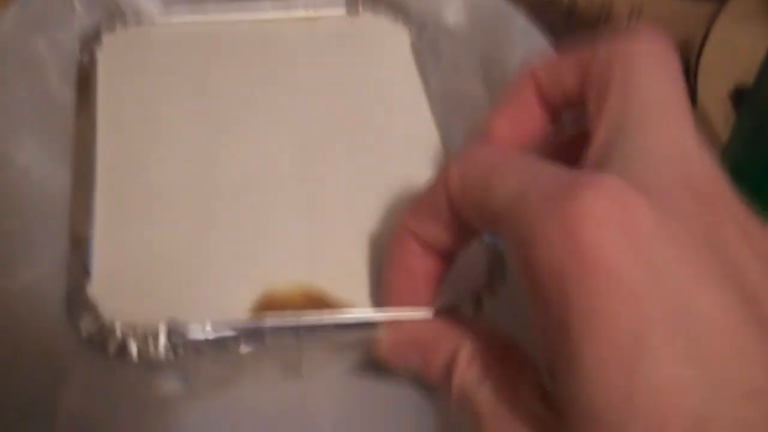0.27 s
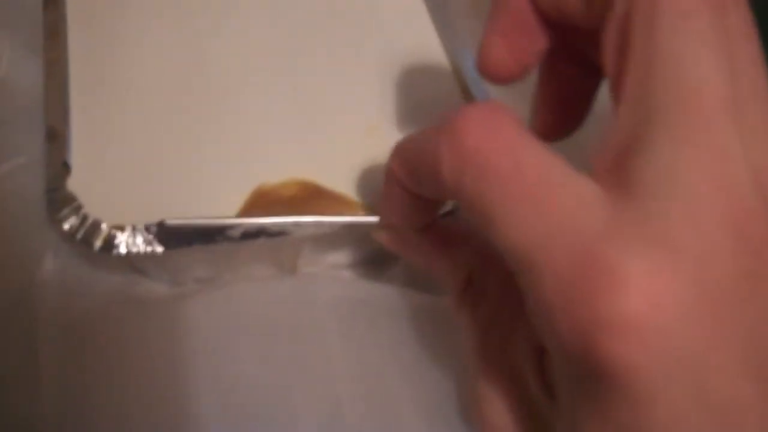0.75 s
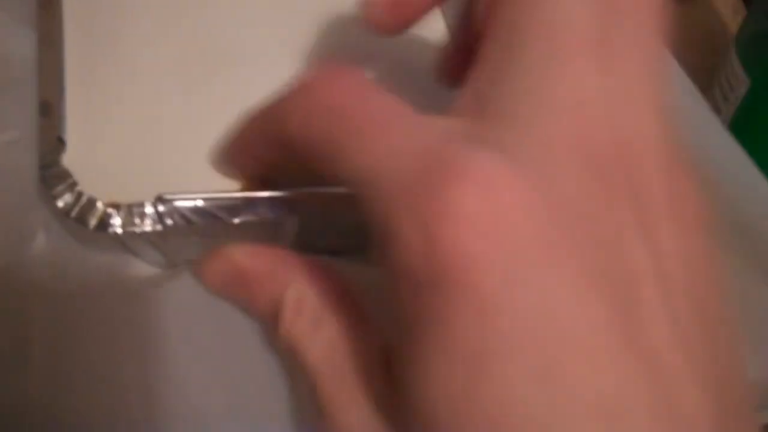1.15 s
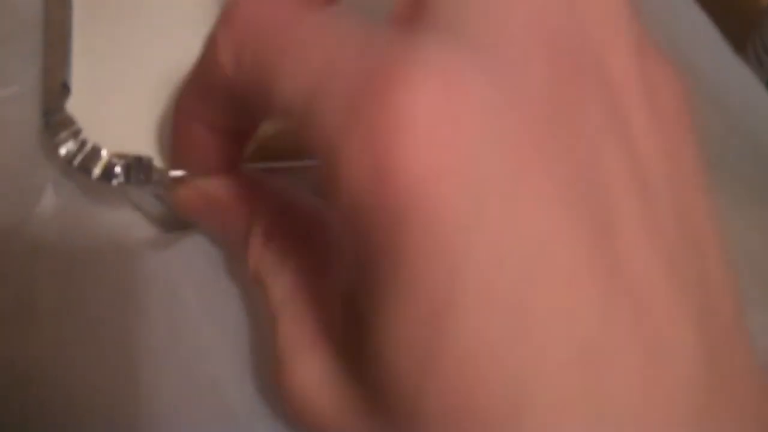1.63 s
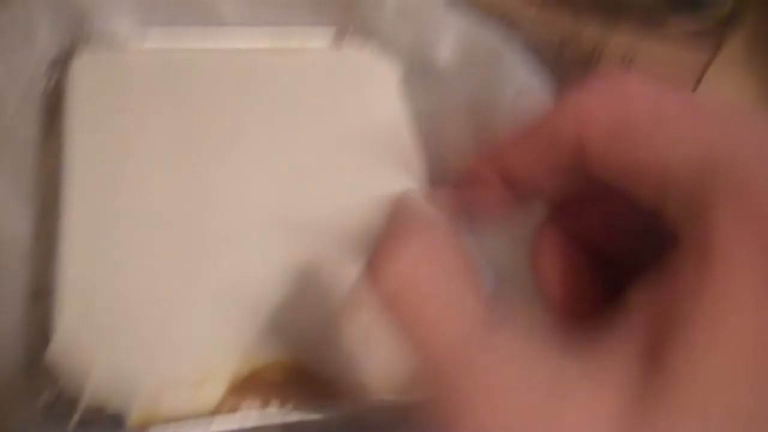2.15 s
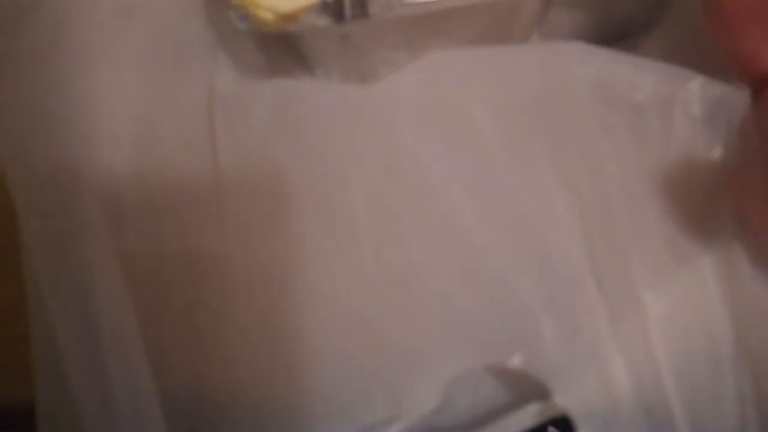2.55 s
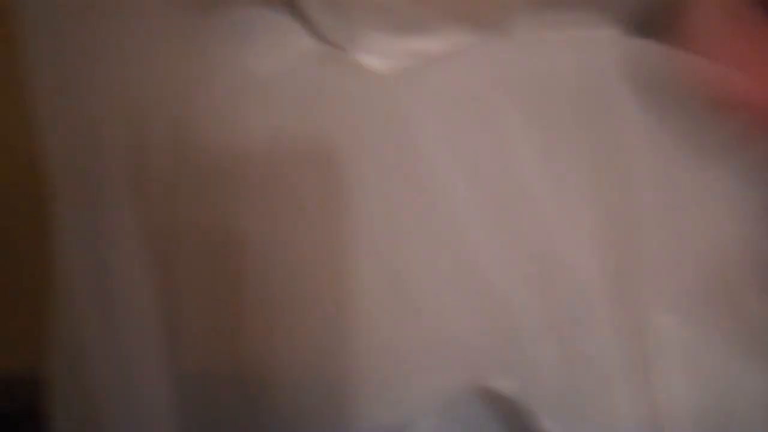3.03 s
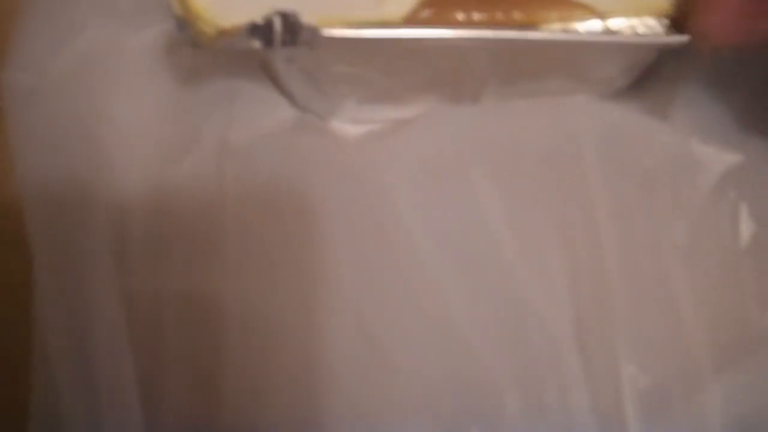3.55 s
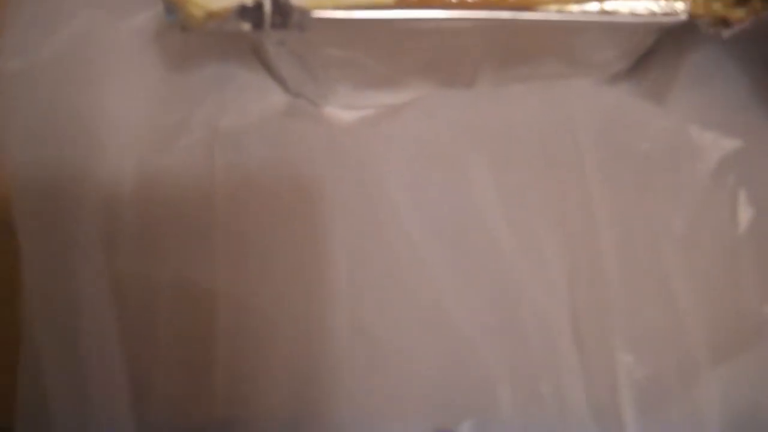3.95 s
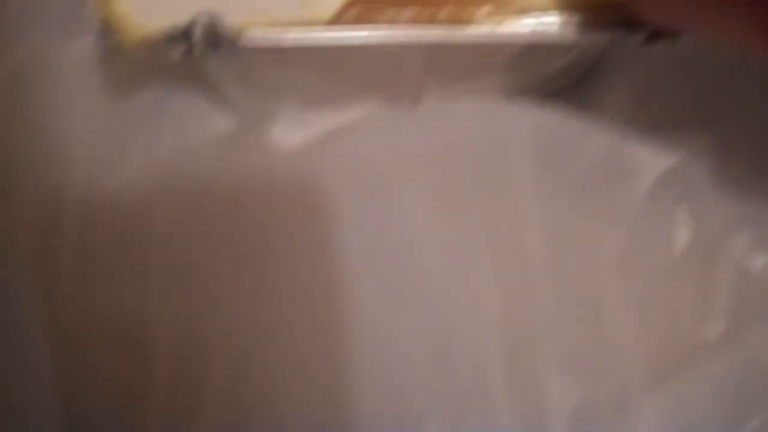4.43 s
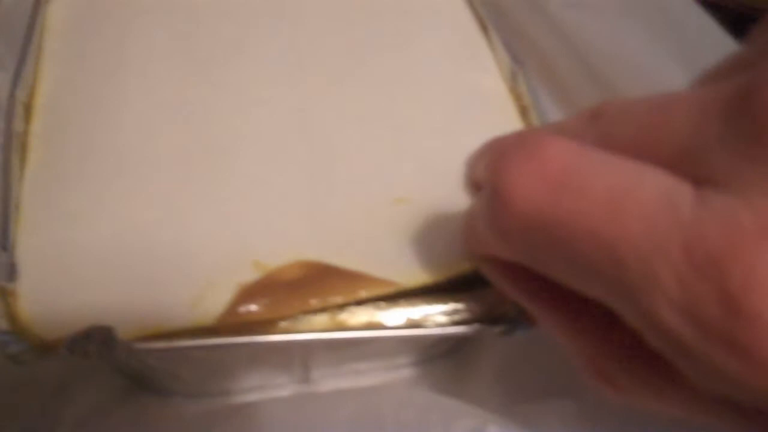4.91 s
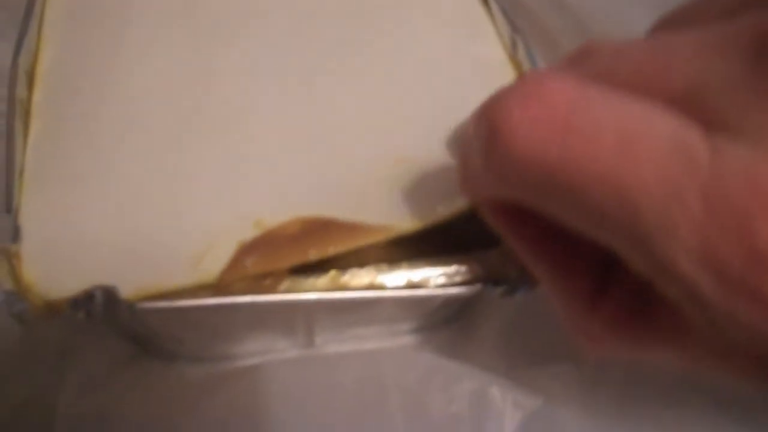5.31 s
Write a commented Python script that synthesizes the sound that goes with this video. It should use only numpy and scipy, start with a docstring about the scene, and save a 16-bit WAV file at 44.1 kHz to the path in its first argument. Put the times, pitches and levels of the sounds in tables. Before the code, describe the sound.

Crisp foil and thin plastic crinkle and snap close up, swelling into a loud crackling burst, then thinning to sparse ticks in a quiet room.

```python
"""Fingers bend up the rim of a foil tray in a plastic bag, then prise off its card lid, close to two microphones.
From the start, bag and foil rustle as swarms of noise clicks and tiny ticks; creases snap and dents pop with a pitch.
Near 2.4 s the tray drags over the table as low noise, then all sound dips briefly; the loudest snap, at 3.15 s,
overloads. The rustle thins out; near 4.75 s knocks ring the tray's tones, and the last snaps come by 5.53 s.
Throughout, a small room adds short echoes, steady air noise and the wavering tones of a running appliance."""
import sys
import numpy as np
from scipy import signal
from scipy.fft import rfft, irfft
from scipy.io import wavfile
from scipy.ndimage import uniform_filter1d

SR = 44100
rng = np.random.default_rng(int(sys.argv[2]) if len(sys.argv) > 2 else 0)


def persist_wave(psi):
    """Save psi, clipped to +-1, as 16-bit WAV."""
    counts = np.round(np.clip(psi, -1, 1) * 32767).astype(np.int16)
    wavfile.write(sys.argv[1], SR, np.atleast_2d(counts).T)


N = 245443

# The five bands, here called thump, body, middle, treble and top: lower f/Hz, upper f/Hz
BAND_EDGES = [(300, 1100), (1100, 2800), (2800, 4500), (4500, 9000), (9000, 18000)]
# Likeness of left and right, one number for each band (1 = the same, 0 = unrelated)
BAND_LIKENESS = [0.86, 0.87, 0.63, 0.25, 0.089]
# Tone colour of the foil heard through the microphone ports: f/Hz, relative level/dB
FOIL_COLOUR = [(240, -42.5), (400, -35), (910, -23.5), (1070, -27), (1230, -19.5), (1450, -17.5),
               (1920, -11.5), (2670, -11), (4170, -8), (6150, 5), (7250, 3), (9630, -11.5), (14200, -12)]
# Difference between the two microphone ports: f/Hz, left minus right/dB
PORT_DIFFERENCE = [(400, -1), (1300, -1.5), (2400, 0.5), (4400, 0), (5800, -6.5), (7000, 9.5), (8500, 11.5),
                   (11000, 21), (15000, 12)]

# How hard the fingers work the bag and foil: t/s, treble level/dB
RUSTLE_LEVEL = [(0.015, -45.5), (0.113, -43), (0.193, -49.5), (0.268, -35.5), (0.33, -43), (0.375, -39.5),
                (0.41, -47), (0.467, -51), (0.514, -43.5), (0.53, -34.5), (0.579, -39), (0.665, -34.5),
                (0.781, -34), (0.832, -36.5), (0.945, -36.5), (1.0, -31), (1.13, -41), (1.156, -55),
                (1.232, -45), (1.256, -24.5), (1.285, -29), (1.31, -37), (1.382, -45.5), (1.499, -57),
                (1.657, -57.5), (1.72, -36), (1.776, -47), (1.92, -28.5), (2.07, -37), (2.139, -35),
                (2.209, -47.5), (2.233, -53), (2.319, -59), (2.34, -33), (2.37, -23.5), (2.419, -33.5),
                (2.478, -30.5), (2.484, -30), (2.499, -38.5), (2.582, -20), (2.718, -43), (2.748, -34.5),
                (2.794, -33.5), (2.833, -23), (2.932, -20), (2.962, -23), (3.002, -21), (3.138, -23.5),
                (3.162, -33.5), (3.209, -29.5), (3.25, -54), (3.341, -48.5), (3.402, -64), (3.482, -44.5),
                (3.66, -57.5), (3.911, -57), (4.159, -64), (4.3, -60), (4.5, -66), (4.525, -59),
                (4.555, -47), (4.59, -53), (4.63, -62), (4.731, -64), (4.75, -45), (4.863, -62),
                (4.91, -56), (4.955, -50), (4.995, -62), (5.05, -67), (5.085, -54), (5.155, -61),
                (5.175, -54), (5.22, -62), (5.53, -64)]
# Swell of the rustle's three lower bands against the treble: t/s, level/dB
RUSTLE_FULLNESS = [(0, 1), (0.3, 0), (0.6, -1), (0.9, 0), (1.08, 4.5), (1.25, 0), (1.7, -0.5), (2.0, 0.5),
                   (2.2, -0.5), (2.42, 0), (2.55, -1.5), (2.7, 2.5), (3.0, -0.5), (3.3, 2.5), (4, 3),
                   (4.55, -3), (4.75, 3), (4.93, -4.5), (5.1, -0.5), (5.5, 0)]
# Thump, body and middle of the rustle: level against treble/dB when brisk, gain in dB per dB of softer rustle
RUSTLE_TILT = [(-23, 0.51), (-15.5, 0.21), (-12, 0.21)]
# Grain of each band: steady bed under the clicks/dB, share of the loudest clicks/dB
RUSTLE_GRAIN = [(0, -10), (-1, -6), (-3, -4), (-5.5, 0), (-1, -5)]
# Loudest clicks of the rustle: t/s, relative level/dB
LOUD_CLICKS = [(0.0651, 4), (0.072, 11.5), (0.091, 4), (0.1516, 9), (0.2129, 11), (0.374, 5), (0.5963, 8),
               (0.634, 10.5), (0.658, 5), (0.6708, 12.5), (0.675, 13), (0.703, 12), (0.7144, 6),
               (0.7227, 6.5), (0.7441, 8), (0.8348, 6), (0.8614, 9), (0.9122, 9), (1.0147, 7), (1.0233, 8),
               (1.1147, 6), (1.348, 10.5), (1.7101, 6), (1.7574, 9.5), (1.761, 9), (1.7929, 15),
               (1.814, 16.5), (1.8335, 12), (1.853, 12), (1.8876, 6), (1.891, 5), (1.9141, 8), (2.0007, 7),
               (2.0222, 7.5), (2.0385, 9), (2.0435, 8), (2.0496, 6), (2.101, 6), (2.125, 8.5), (2.179, 6),
               (2.1884, 13), (2.3543, 6), (2.3745, 8.5), (2.384, 9), (2.4249, 7), (2.4377, 7), (2.4496, 6),
               (2.4601, 11), (2.5102, 10), (2.5162, 10.5), (2.58, 2.5), (2.6419, 2), (2.649, 6),
               (2.6935, 10), (2.748, 12.5), (2.769, 3.5), (2.786, 6.5), (2.8977, 5.5), (2.9024, 5),
               (2.9368, 3.5), (2.9716, 3.5), (3.0702, 3), (3.0922, 5), (3.1046, 3), (3.129, 5), (3.1969, 8),
               (3.2143, 5)]
# Snapping creases: t/s, treble peak level/dB, body/dB, middle/dB, top/dB (these three against
# the treble peak), left minus right/dB, width/ms
CREASE_SNAPS = [(0.011, -27, -9.5, -10, -14, -3, 2.4), (0.04, -27.5, -16, -18, -19, 5, 1.9),
                (0.068, -29.5, -4, -17, -23, -2, 1.2), (0.085, -33, -8, -16, -18, 0, 1.3),
                (0.0988, -19, -10, -23, -22, -1, 0.46), (0.114, -27, -22, -20, -18, -1, 2),
                (0.123, -26, -8.5, -15, -17, 10, 0.81), (0.1315, -26.5, -7, -17, -9, -6, 2.7),
                (0.16, -23, -4.5, -9, -19, -0.5, 1.6), (0.217, -22.5, -13.5, -25, -15, -7, 1.1),
                (0.245, -27, -18, -14, -16, -2, 1.5), (0.256, -33, -18, -18, -16, -2, 2),
                (0.269, -19, -10, -14, -20, -4, 1.7), (0.2733, -15.5, -15, -14, -13, -3, 2.2),
                (0.299, -25, -21, -16, -18, 0, 1.1), (0.3145, -20.5, -20, -7, -10, -1, 2.6),
                (0.3347, -26, -23, -18, -20, -2, 1.2), (0.3597, -28, -17, -15, -15, 2, 1.7),
                (0.37, -22, -14, -19, -17, -2, 1), (0.389, -28, -18, -14, -14, 0, 2.7),
                (0.4414, -22, -12.5, -14, -20, -0.5, 4.2), (0.482, -29, -19, -14, -25, -6, 1.1),
                (0.5254, -17, -27, -22, -22, 0, 1.4), (0.537, -22, -20, -16, -18, 0, 3.3),
                (0.551, -24, -15, -14, -17, 0, 3), (0.556, -18, -15, -13, -15, -4, 2),
                (0.581, -36, -24, -16, -18, 2, 2.8), (0.594, -24, -20, -13, -18, -3, 2.3),
                (0.608, -21, -11, -8, -10, 0, 1.8), (0.627, -23, -9, -12, -14, 0, 2.7),
                (0.654, -21.5, -13, -3, -14, 2, 4.1), (0.6752, -21.5, -12, -7, -4, -2, 1.3),
                (0.6972, -17, -26, -11, -10, -1, 1.9), (0.772, -19.5, -25, -12, -8, 2, 1.7),
                (0.795, -21, -28, -13, -14, 2, 0.7), (0.8678, -13, -27, -16, -19, 1, 2.3),
                (0.896, -20, -21, -16, -16, 0, 1.7), (0.9027, -18.5, -8.5, -12, -15, -2, 1.5),
                (0.9229, -13, -23, -13, -12, -1, 2.6), (0.9585, -16.5, -15, -8, -7, -5, 1.9),
                (1.02, -14.5, -24, -27, -17, 1, 0.95), (1.037, -24, -22, -20, -17, 3, 0.7),
                (1.05, -24, -17, -19, -18, -4, 0.92), (1.063, -26, -6, -21, -18, -3, 2.8),
                (1.091, -18, -16, -20, -14, -3, 2), (1.126, -25, -17, -12, -18, 0, 1.4),
                (1.142, -25, -19, -20, -15, -7, 2.3), (1.2399, -17, -22, -8, -22, -1, 0.69),
                (1.2434, -17.5, -25, -7, -17, -1, 1.1), (1.2456, -16.5, -19, -9.5, -22, 1, 1.0),
                (1.255, -12, -20, -9, -17, -1, 0.78), (1.2626, -13.5, -28, -8, -20, -4, 1.9),
                (1.277, -19, -16, -5, -10, 1, 2.1), (1.316, -13.5, -14, -10.5, -12, 0, 1.5),
                (1.3698, -24, -28, -8, -14, -1, 1.4), (1.405, -19.5, -23, -11.5, -14, -2, 1.3),
                (1.44, -28.5, -14, -14, -13, 0, 0.82), (1.45, -31, -15, -17, -18, 0, 1.6),
                (1.6339, -31, -14, -11, -10, -5, 1.2), (1.731, -17.5, -34, -15, -16, 4, 0.65),
                (1.7796, -15.5, -23, -15, -15, -4, 1.4), (1.803, -13, -27, -16, -20, 3, 0.97),
                (1.829, -21, -28, -10, -14, -2, 2), (1.8558, -17, -33, -16, -17, 2, 1.3),
                (1.909, -13.5, -26, -20, -14, -1, 2.2), (1.957, -16.5, -21, -7, -3, -4, 1.1),
                (2.0319, -16.5, -21, -13, -12, 2, 0.91), (2.0888, -14, -35, -13.5, -10, -1, 1),
                (2.1145, -15.5, -32, -15, -11, -1, 1.1), (2.149, -15, -31, -7, -11, 2, 0.43),
                (2.159, -16.5, -38, -24.5, -14, -7, 0.71), (2.2, -20, -19, -15, -19, -3, 1.8),
                (2.289, -32, -20, -12, -20, -4, 0.9), (2.3335, -25.5, -9.5, -11, -18, 1, 4.3),
                (2.4925, -17, -20, -16, -20, 0, 1.5), (2.524, -15.5, -29, -11, -20, -1, 0.77),
                (2.547, -14, -30, -5, -21, -1, 0.78), (2.575, -14, -20, -14, -17, 5, 2.6),
                (2.5853, -7.5, -19, -16, -17, 2, 1.5), (2.589, -13, -27, -11, -15, 15, 1.7),
                (2.605, -15, -19, -10, -9, 3, 3.8), (2.6194, -18, -17, -16, -12, 7, 1),
                (2.646, -19.5, -27, -4, -8, 2, 1.3), (2.6678, -14, -22, -18, -17, 0, 0.96),
                (2.675, -19, -17, -16, -18, -2, 1.5), (2.6802, -16, -15, -10, -19, -5, 1.4),
                (2.698, -17.5, -25, -15, -20, 4, 1.5), (2.72, -21, -31, -23, -22, 5, 0.58),
                (2.7365, -13, -21, -15, -13, 2, 2), (2.752, -11, -16, -15, -21, -5, 1.1),
                (2.7574, -4.5, -31, -32, -26, 11, 0.87), (2.808, -14.5, -14, -12, -16, 3, 0.98),
                (2.827, -16, -19, -19, -13, -1, 1.2), (2.834, -14, -29, -20, -17, 1, 1.3),
                (2.848, -14, -23, -18, -17, 1, 1.4), (2.856, -11, -21, -18, -17, 1, 1.2),
                (2.863, -19, -22, -16, -19, 1, 1), (2.892, -6.5, -18, -21, -15, -2, 1.3),
                (2.934, -10, -12, -23, -9, 1, 0.68), (2.943, -11, -20, -27, -19, 1, 1.8),
                (3.002, -7.5, -13, -15, -17, -3, 1.1), (3.15, 0, -15.5, -17, -22, -5, 2.7),
                (3.177, -14, -23, -17, -18, 0, 1.2), (3.185, -15.5, -25, -25, -10, -2, 1.3),
                (3.217, -23, -9, -16, -18, -2, 1.5), (3.228, -31, -20, -16, -18, 0, 1.3),
                (3.243, -25.5, -22, -17, -19, 6, 1.3), (3.263, -27, -23, -16, -10, -6, 0.91),
                (3.299, -18, -24, -20, -15, 4, 0.53), (3.307, -24, -20, -14, -20, -4, 2),
                (3.315, -23.5, -18, -16, -14, 4, 1.3), (3.33, -26, -25, -16, -17, 0, 1.1),
                (3.3448, -21.5, -12, -11, -10, -4, 0.93), (3.351, -27, -16, -11, -16, 0, 1.2),
                (3.375, -33, -22, -18, -18, 0, 1.2), (3.3812, -29.5, -15, -10, -14, 0, 1.5),
                (3.4056, -23, -19, -4, -6, 0, 0.56), (3.426, -25.5, -25, -17, -19, -2, 1.1),
                (3.4491, -22, -11, -10, -9, 2, 0.71), (3.487, -22.5, -30, -23, -17, -1, 1.1),
                (3.524, -25.5, -16, -16, -13, -4, 2.3), (3.5372, -36, -13, -16, -13, -1, 1.3),
                (3.5668, -20.5, -12, -12, -25, -4, 1.3), (3.5778, -26.5, -8.5, -14, -19, 1, 0.82),
                (3.6152, -24, -27, -18, -16, 0, 1.5), (3.634, -19.5, -17, -16, -18, 7, 0.8),
                (3.6403, -6, -11.5, -7, -13, -4, 1.5), (3.66, -21, -20, -17, -18, 0, 1.3),
                (3.664, -30, -17, -17, -18, 1, 1.3), (3.671, -33, -17, -15, -14, 1, 1.5),
                (3.699, -17, -22, -24, -19, 1, 1.9), (3.747, -33, -16, -3, -14, 2, 1.4),
                (3.7596, -9, -15, -14.5, -14, 3.5, 1.2), (3.832, -38, -8, -12, -18, -2, 1.5),
                (3.8437, -25, -22, -20, -9, 6, 0.56), (3.8689, -37, -11, -14, -15, 1, 1.0),
                (3.8778, -27.5, -6.5, -4, -15, -2, 1.4), (3.9145, -31, -3, -10, -20, -2, 1.3),
                (3.919, -31, -5, -4, -20, 0, 1.5), (3.922, -31, -10, -8, -14, -2, 1),
                (3.925, -10.5, -13, -5, -8, 0, 0.85), (4.007, -39, -10, -14, -17, -7, 1.2),
                (4.0236, -20.5, -19, -9, -15, -2, 3.1), (4.049, -40, -11, -10, -21, -2, 0.8),
                (4.1069, -38, -18, -15, -14, 0, 1.4), (4.1218, -26.5, -16, -11, -10, -2, 0.71),
                (4.158, -43.0, -6, -11, -12, -1, 1.4), (4.3923, -19, -19, -13, -7, 0.5, 1.1),
                (4.5514, -34, -23, -19, -21, 1, 1.3), (4.6661, -25.5, -17.5, -14.5, -1.5, 4, 1.5),
                (4.8183, -39, -17, -18, -17, 2, 1.4), (4.8816, -34, -19.5, -8, -4, 1, 1.7),
                (5.0083, -28.5, -13.5, -17, -12, 1, 1.9), (5.0703, -18.5, -20.5, -10.5, -14, -0.5, 1.1),
                (5.09, -36, -18, -13, -11, -7, 1.2), (5.1054, -39, -18, -5, -12, -1, 1.8),
                (5.181, -44, -23, -13, -14, 3, 1.1), (5.3645, -40, -14, -3.5, -16.5, -3, 1.5),
                (5.395, -42, -12, -10, -14, 0, 1.5), (5.4321, -32, -13, -8, -23, 5, 0.7),
                (5.506, -21, -20, -9, -16, 5, 0.6), (5.5078, -19, -17, -10, -9, 3, 0.72),
                (5.5135, -37, -20, -12, -16, 3, 1.5), (5.528, -34, -15, -8, -22, 5, 1.3)]
# Popping dents: t/s, f/Hz before a small random stray, peak level/dB, time to fall 60 dB/ms
DENT_POPS = [(0.956, 3080, -36, 25), (1.059, 1320, -31.5, 19), (1.105, 1340, -39, 21),
             (1.125, 3200, -36, 12), (1.2615, 2080, -28, 16), (1.2755, 4400, -23, 10),
             (1.282, 6330, -20, 7.1), (1.313, 7300, -27, 6), (2.383, 1300, -41, 16), (2.391, 1730, -35, 30),
             (2.545, 1350, -41, 30), (3.1502, 1250, -28, 14), (3.64, 7300, -6, 6.9), (3.64, 6760, -7, 5),
             (3.64, 2860, -15, 5), (3.641, 4020, -20, 6), (3.64, 1920, -26, 3.5), (3.6987, 6600, -26, 5),
             (3.7592, 7420, -9.5, 5.6), (3.7597, 6770, -12.5, 5), (3.7589, 2300, -22.5, 4.8),
             (3.9241, 2610, -21, 3.5), (3.9243, 4010, -22, 11), (3.9243, 4850, -21, 6),
             (3.924, 6160, -23, 6), (3.9236, 7350, -11.5, 4.2), (4.552, 6000, -41, 12),
             (4.578, 3700, -47, 10), (4.666, 6200, -30, 8.9), (4.8184, 7350, -41, 6), (5.069, 5900, -25, 8),
             (5.432, 3350, -41, 10), (5.5055, 3740, -21.5, 3.5), (5.5072, 3700, -23, 5),
             (5.506, 2350, -37, 8.9), (5.506, 3160, -28, 5), (5.506, 4470, -31, 7),
             (5.5066, 7420, -21, 4.6)]
# Knocks on the tray: t/s, relative level/dB
TRAY_KNOCKS = [(4.7465, -35), (4.7495, -27), (4.757, -32.5), (4.77, -33), (4.79, -36)]
# Tones at which the tray rings: f/Hz, relative level/dB, time to fall 60 dB/s
TRAY_TONES = [(628, -7.5, 0.045), (720, -10, 0.03), (1590, -12.5, 0.035), (1710, -6.5, 0.03),
              (2270, -5, 0.015), (2800, -8, 0.012), (3880, -10, 0.008), (5850, -3, 0.016)]

# Tone colour of the room's air noise: f/Hz, relative level/dB
AIR_COLOUR = [(15, -61), (25, -13.5), (69, -19.5), (167, -15), (231, -2.5), (335, -12.5), (415, -6),
              (515, -9.5), (879, -8), (1060, -12.5), (1150, -12.5), (1960, -18), (7680, -24.5),
              (13800, -29.5), (15000, -55)]
# Likeness of left and right in the air noise: f/Hz, likeness (1 = same, -1 = opposite)
AIR_LIKENESS = [(60, -0.53), (130, 0.77), (290, 0.79), (640, 0.85), (1410, 0.62), (3100, -0.23),
                (6820, -0.57), (15000, 0.14)]
# Middle of each appliance tone: f/Hz
HUM_PITCHES = [228.6, 252.2, 294.3, 138.4, 458, 578, 724, 838, 883, 1143]
# Spread of each appliance tone, in the same order: width/Hz, relative level/dB
HUM_TONES = [(3, -55.5), (4, -68.5), (4, -65), (20, -74), (4, -72), (3, -72.5), (4, -73), (4, -71),
             (3, -67), (3, -71)]

BRISK_DB = -30  # the rustle level at which the tilt adds nothing
CLICKS_PER_S, CLICK_MS, CLICK_SPREAD_DB, LOUD_MS = 900, 0.65, 2.2, 0.6
DRAG_S, DRAG_DB, DRAG_BASS_DB = 2.42, -46, -9  # time and level of the fullest drag; bass against body
DRAG_RISE_DB_PER_S, DRAG_FALL_DB_PER_S = 170, 130
DIP_S, DIP_MS, DIP_DB = 2.4915, 7.5, -12  # all sound dips for a moment
LEFT_LAG = 2  # samples by which near sound reaches the left port later
ECHO_T60_S, ECHO_DB = 0.11, -17.5
AIR_DB = -55
SHELF_HZ, TOP_HZ = 14200, 16600  # where the top steps down, and where it ends


def undb(db):
    """Turn decibels into a plain factor."""
    return 10 ** (np.asarray(db) / 20)


def unit(x):
    """Scale a sound to an average (RMS) strength of 1."""
    return x / np.sqrt(np.mean(x ** 2))


def on_hz(table, hz):
    """Read a table of frequency and value on a log axis."""
    points, values = np.transpose(table)
    return np.interp(np.log(hz + 1), np.log(points), values)


def on_time(table):
    """Read a table of time and value at every sample."""
    s, values = np.transpose(table)
    return np.interp(np.arange(N) / SR, s, values)


def band_pass(x, low_hz, high_hz):
    """Keep what lies between two frequencies."""
    return signal.sosfilt(signal.butter(3, (low_hz, high_hz), "band", fs=SR, output="sos"), x)


def high_pass(x, hz):
    """Weaken what lies below a frequency."""
    return signal.sosfilt(signal.butter(2, hz, "high", fs=SR, output="sos"), x)


def walk(rate):
    """Random levels held for 1 / rate seconds, with smooth slides between them; spread near 1."""
    hold = int(SR / rate)
    steps = np.repeat(rng.standard_normal(N // hold + 1), hold)
    return 1.202 * uniform_filter1d(steps, hold)[:N]


def pair(shape, alike):
    """Make left and right noise alike by mixing a shared part with an opposed part."""
    mid, side = rng.standard_normal((2, *shape))
    alike = np.clip(alike, -.99, .99)
    shared, opposed = np.sqrt(1 + alike) * mid, np.sqrt(1 - alike) * side
    return np.array([shared + opposed, shared - opposed])


def decay(x, ms):
    """Each impulse starts a tail that dies away exponentially."""
    return signal.lfilter([1], [1, -np.exp(-1 / (SR * ms * 1e-3))], x)


def ports(size=512):
    """Foil and both ports colour a click, with no sound ahead of it: the log gain's echo series is folded forward."""
    hz = np.arange(size + 1) * SR / 2 / size
    half_split = np.array([[.5], [-.5]])
    db = on_hz(FOIL_COLOUR, np.minimum(hz, 13500)) + half_split * on_hz(PORT_DIFFERENCE, hz)
    cepstrum = irfft(db * np.log(10) / 20)
    cepstrum[:, 1:size] *= 2
    cepstrum[:, size + 1:] = 0
    return irfft(np.exp(rfft(cepstrum)))[:, :size]


def bands():
    """Cut the port responses into the five bands, each with a mean energy of 1."""
    cut = [band_pass(ports(), *edges) for edges in BAND_EDGES]
    return [c / np.sqrt(np.mean(np.sum(c ** 2, -1))) for c in cut]


def rustle(colour_db=2.0, swarm_db=1.0, swarm_per_s=130, top_db=-18, grip_db=1.0, grip_per_s=25,
           shift_db=1.3, shift_per_s=35, loud_db=-2.5):
    """Buckling sheets click in swarms; each click is a short noise burst with its own, drifting colour."""
    level_db = on_time(RUSTLE_LEVEL)
    fullness_db = on_time(RUSTLE_FULLNESS)
    relative_db = [db + fullness_db + slope * (BRISK_DB - level_db) for db, slope in RUSTLE_TILT]
    relative_db += [0, top_db]
    hit, size = rng.random(N), rng.exponential(size=N)
    clicks = (hit < CLICKS_PER_S / SR) * undb(np.minimum(CLICK_SPREAD_DB * size, 10))
    swarm = undb(swarm_db * walk(swarm_per_s) + grip_db * walk(grip_per_s))
    loud = np.zeros(N)
    s, over_db = np.transpose(LOUD_CLICKS)
    # the last factor makes two tails in a row peak near 1
    loud[(s * SR).astype(int)] = undb(over_db + loud_db) * np.e / (SR * LOUD_MS / 1000)
    out = 0
    for response, alike, db, (bed_db, share_db) in zip(bands(), BAND_LIKENESS, relative_db, RUSTLE_GRAIN):
        colour = undb(colour_db * np.clip(rng.standard_normal(N), -2, 2))
        # two tails in a row round the attack of each click
        small = unit(decay(decay(clicks * colour, CLICK_MS), CLICK_MS))
        shift = undb(shift_db * walk(shift_per_s))
        shape = unit((small + undb(bed_db)) * swarm * shift)
        shape = shape + undb(share_db) * decay(decay(loud, LOUD_MS), LOUD_MS)
        burst = signal.fftconvolve(pair((N,), alike) * shape, response, axes=1)[:, :N]
        out = out + undb(level_db + db) * unit(burst)
    return out


def crinkle(count=3000, spread_db=1.5, cycles=4.5, low_hz=1400, high_hz=9000, size=300):
    """Tiny plastic folds tick at random, each with its own pitch and side, as loud as the fingers work."""
    when, pitch, strength, side, turn = rng.random((count, 5)).T[:, :, None]
    at, t = (when * N).astype(int), np.arange(size) / SR
    hz = low_hz * (high_hz / low_hz) ** pitch
    spread = -spread_db * np.log(np.maximum(strength, .02))
    db = on_time(RUSTLE_LEVEL)[at] + on_hz(FOIL_COLOUR, hz) + spread
    age = t * hz / cycles * 4
    swell = age * np.exp(1 - age)  # rises to 1, then dies away
    tick = np.sin(2 * np.pi * (hz * t + turn)) * swell * undb(db)
    pan_db = on_hz(PORT_DIFFERENCE, hz) + 8 * (side - .5)
    out = np.zeros((2, N + size))
    for line, sign in zip(out, (1, -1)):
        np.add.at(line, at + np.arange(size), tick * undb(sign * pan_db / 2))
    return high_pass(out[:, :N], 500)


def snaps(ring_db=-12, thump_db=-12, shiver_ms=4.9, scatter_db=4.5, size=1200):
    """A crease flips over in a few milliseconds at most, then the sheet shivers briefly and unevenly."""
    s, peak_db, body_db, middle_db, top_db, pan_db, ms = np.transpose(CREASE_SNAPS)[:, :, None]
    t = np.arange(size) / SR * 1000 - 4  # ms, with room ahead of the flip
    scatter = np.repeat(rng.standard_normal((len(CREASE_SNAPS), size // 40)), 40, axis=1)
    uneven = undb(scatter_db * np.clip(scatter, -2, 1.2))
    shiver = np.exp(-np.maximum(t, 0) / shiver_ms) * (t > 0) * uneven
    flip = np.exp(-(t / np.clip(ms / 2, .15, 2)) ** 2)
    shape = flip + undb(ring_db) * shiver
    starts = ((s[:, 0] - .0043) * SR).astype(int)
    out = np.zeros((2, N + size))
    band_db = (body_db + thump_db, body_db, middle_db, 0, top_db)
    for response, alike, db in zip(bands(), BAND_LIKENESS, band_db):
        noise = pair(shape.shape, alike) * shape
        rows = signal.fftconvolve(noise, response[:, None], axes=2)[:, :, :size]
        peaks = np.abs(rows).max(2, keepdims=True)
        rows = rows / np.sqrt(np.mean(peaks ** 2, 0))
        rows = rows * undb(peak_db + db + np.array([pan_db, -pan_db]) / 2)
        for k, at in enumerate(starts):
            out[:, at:at + size] += rows[:, k]
    return out[:, :N]


def pops(attack_ms=0.61, size=2000):
    """Each dent rings one short tone whose pitch strays a little from its table value."""
    t, out = np.arange(size) / SR, np.zeros((2, N + size))
    for (s, hz, db, ms), (stray, turn) in zip(DENT_POPS, rng.standard_normal((len(DENT_POPS), 2))):
        tone = np.sin(2 * np.pi * (hz * (1 + 0.0074 * stray) * t + turn))
        attack = 1 - np.exp(-t * 1000 / attack_ms)
        ring = tone * 1000. ** (-t * 1000 / ms) * attack
        pan_db = on_hz(PORT_DIFFERENCE, hz)
        gain = undb(db + np.array([[pan_db], [-pan_db]]) / 2)
        at = int(s * SR)
        out[:, at:at + size] += ring / np.abs(ring).max() * gain
    return out[:, :N]


def knocks(gain_db=-8, rattle_ms=7):
    """A scuffing blow, made of fading noise, rings the tray's own tones."""
    blows, t = np.zeros(N), np.arange(8000) / SR
    for s, db in TRAY_KNOCKS:
        blows[int(s * SR)] = undb(db + gain_db)
    push = decay(blows, rattle_ms) * rng.standard_normal(N) / 10
    ring = sum(undb(db) * np.sin(2 * np.pi * hz * t) * 1000. ** (-t / t60) for hz, db, t60 in TRAY_TONES)
    # a light tray radiates no bass
    return high_pass(signal.fftconvolve(push, ring)[:N], 400)


def drag():
    """The tray drags over the table: low noise swells, fades and stops short."""
    t = np.arange(N) / SR - DRAG_S
    db = DRAG_DB - np.where(t < 0, -t * DRAG_RISE_DB_PER_S, t * DRAG_FALL_DB_PER_S)
    body = unit(band_pass(rng.standard_normal(N), 220, 1150))
    bass = unit(band_pass(rng.standard_normal(N), 100, 200))
    return (body + undb(DRAG_BASS_DB) * bass) * undb(db) * (t < DIP_S - DRAG_S)


def echo(near):
    """Walls return many weak copies: a fading noise tail smears the near sound."""
    t = np.arange(int(.4 * SR)) / SR
    tail = pair(t.shape, 0.27) * 1000. ** (-t / ECHO_T60_S) * (t > .003)
    tail = signal.lfilter([1], [1, -0.45], tail)  # soft walls dull the echo
    tail = tail / np.sqrt(np.sum(tail ** 2) / 2)
    return undb(ECHO_DB) * signal.fftconvolve(near, tail, axes=1)[:, :N]


def air():
    """Steady air noise: random waves at every frequency, coloured by the room, with a slight waver."""
    hz = np.arange(N // 2 + 1) * SR / N
    noise = pair((2, len(hz)), on_hz(AIR_LIKENESS, hz))
    spectrum = (noise[:, 0] + 1j * noise[:, 1]) * undb(on_hz(AIR_COLOUR, hz))
    return unit(irfft(spectrum, N)) * undb(AIR_DB) * undb(0.9 * walk(10))


def hum(waver=0.15, left_db=-1.5):
    """A running appliance gives narrow tones that waver in pitch and strength."""
    tones = 0
    for f, (width, db) in zip(HUM_PITCHES, HUM_TONES):
        turn = np.cumsum(f + width / 2 * walk(width)) / SR
        strength = undb(db + 0.5) * (1 + waver * walk(width * 2))
        tones = tones + strength * np.sin(2 * np.pi * turn)
    return tones * undb([[left_db / 2], [-left_db / 2]])


def scene():
    """Near sounds reach the left port a touch late; echo, drag, air and hum join them."""
    near = rustle() + crinkle() + snaps() + pops() + knocks()
    near[0] = np.roll(near[0], LEFT_LAG)
    return near + echo(near) + drag() + air() + hum()


def record(dry, shelf_db=-17):
    """The level dips briefly; the converter clips; the top steps down, slopes off, then ends."""
    dip = undb(DIP_DB * np.exp(-((np.arange(N) / SR - DIP_S) * 1000 / DIP_MS) ** 4))
    hard = np.clip(dry * dip, -.95, .95)
    low = signal.sosfiltfilt(signal.ellip(5, .3, 20, SHELF_HZ, fs=SR, output="sos"), hard)
    top = signal.sosfiltfilt(signal.butter(6, 15400, fs=SR, output="sos"), hard - low)
    mixed = low + undb(shelf_db) * top
    return signal.sosfilt(signal.ellip(12, .2, 100, TOP_HZ, fs=SR, output="sos"), mixed)


dry = scene()
out = record(dry)
persist_wave(out)
```